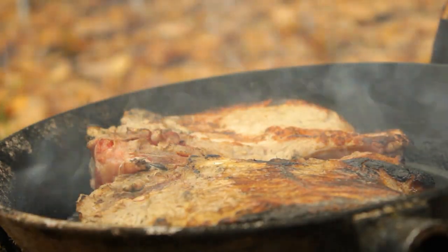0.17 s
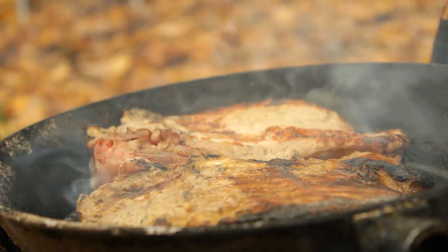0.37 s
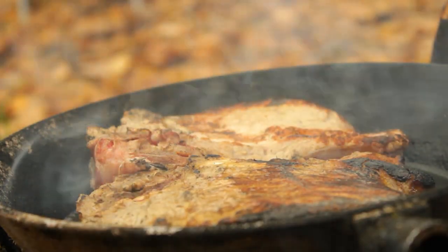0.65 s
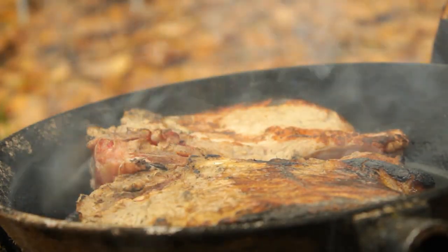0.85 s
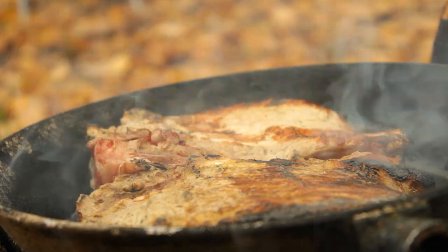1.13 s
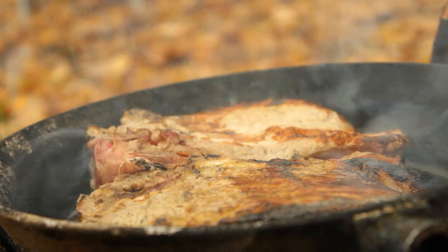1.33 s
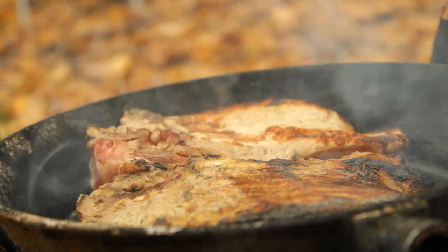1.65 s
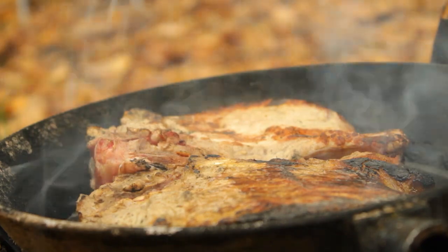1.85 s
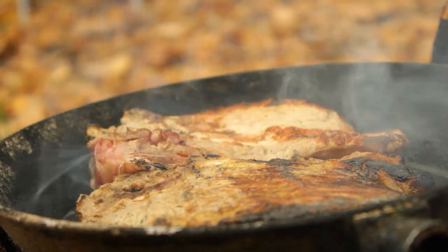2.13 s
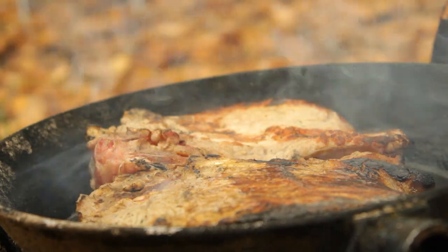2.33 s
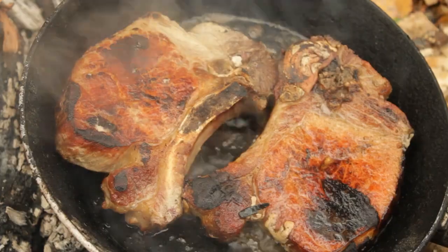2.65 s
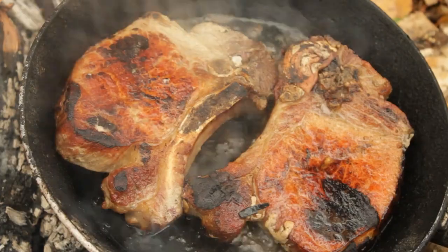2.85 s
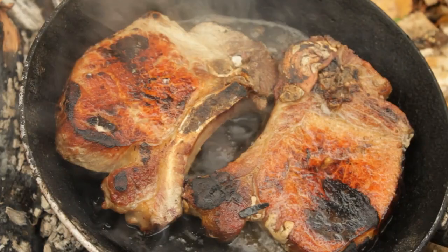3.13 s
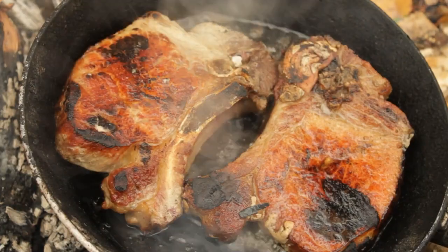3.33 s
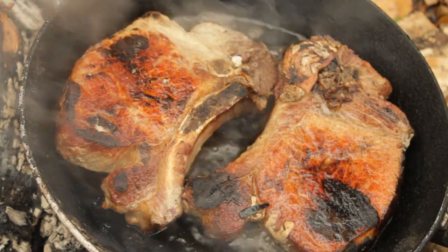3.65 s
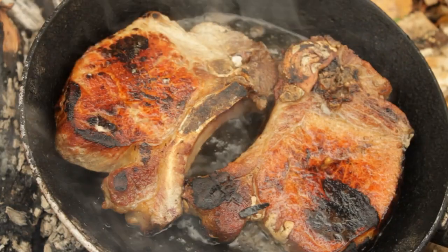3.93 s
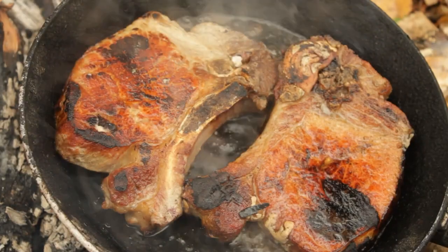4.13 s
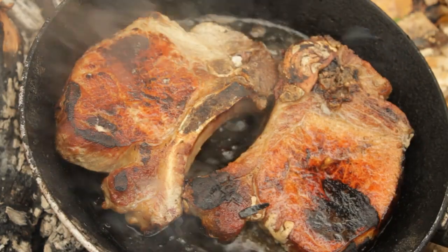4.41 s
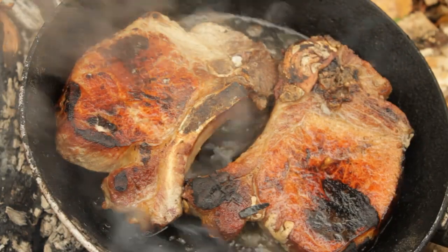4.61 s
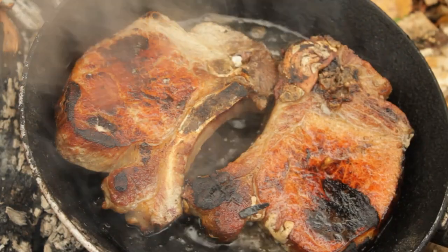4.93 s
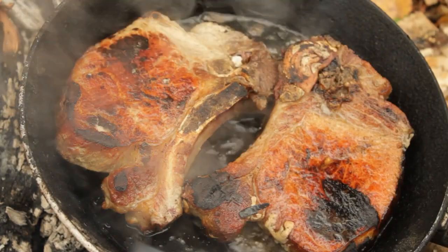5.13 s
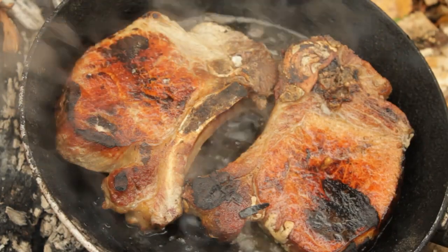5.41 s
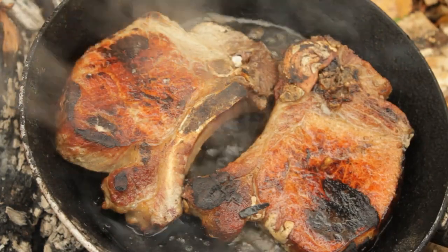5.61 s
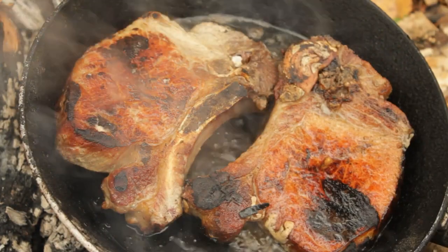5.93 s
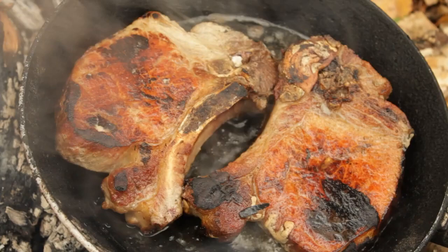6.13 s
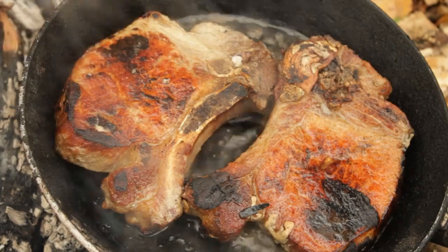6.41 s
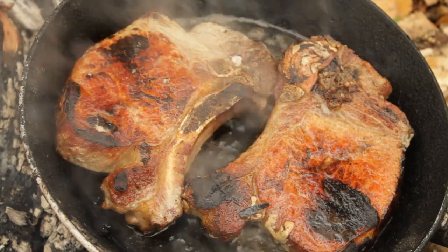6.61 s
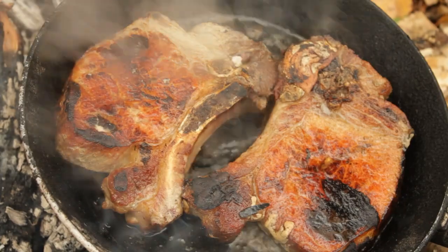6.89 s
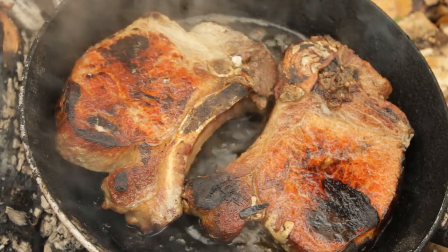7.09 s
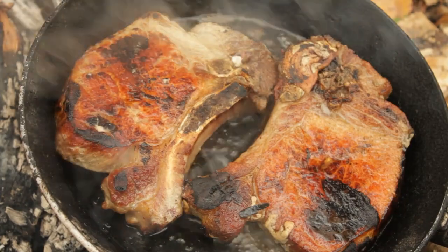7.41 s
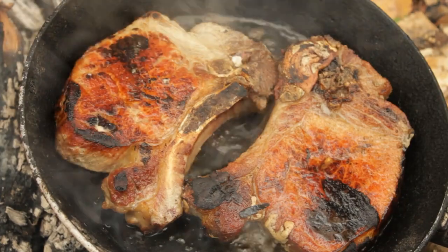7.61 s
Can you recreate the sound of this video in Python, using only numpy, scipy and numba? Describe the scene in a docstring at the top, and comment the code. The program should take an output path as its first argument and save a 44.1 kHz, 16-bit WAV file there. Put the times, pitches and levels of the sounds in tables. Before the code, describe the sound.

Two meat chops fry in hot fat in an iron pan outdoors, heard very close. At first the sizzle is thin, with separate pops, sharp spits and short bubbly blips. After about two and a half seconds, sharp cracks and a faint click mark a sudden change to a denser, brighter sizzle from above. Occasional cracks and bubbles continue; the fire is almost inaudible.

```python
"""Single pops and cracks over a thin sizzle: two chops fry in fat in an iron pan, heard close by from the rim.
The listening place then cuts to above the pan, where the sizzle is denser and brighter. Pings of tiny bubbles,
clicks of fat films and steam hiss make the sizzle. Large steam bubbles are decaying sines that rise in pitch,
spits of fat and a few blunt pops are short noise cracks, faint low bumps (one the click of the cut) are
band-passed pushes; a very faint fire is coloured noise."""
import sys
import numpy as np
from scipy import signal
from scipy.fft import rfft, irfft
from scipy.io import wavfile
from numba import njit

SR = 44100
rng = np.random.default_rng(int(sys.argv[2]) if len(sys.argv) > 2 else 0)


def wrap_up_sound(samples):
    """Save the sound to the file named by the first command line argument, as 16-bit audio."""
    columns = np.atleast_2d(samples).T
    # keep every value between -1 and 1, then stretch to whole-number steps
    tamed = np.clip(columns, -1, 1)
    steps = np.round(tamed * 32767).astype(np.int16)
    wavfile.write(sys.argv[1], SR, steps)


N = 341775
TIME = np.arange(N) / SR


def from_rim():
    """Close at the rim: sparse, distinct pops; fat bubbling beside the meat also rings the hollow there."""
    # how hard the fat boils: t/s, relative level of the fine sizzle/dB
    boil_rows = [(0.0, -33.5), (0.86, -33), (0.97, -36.5), (1.34, -32), (1.48, -38), (1.82, -33),
                 (2.22, -35.5), (2.26, -38), (2.51, -39.5), (2.55, -34.5), (2.61, -35.5)]
    # colour of the frying at the rim: f/Hz, relative level/dB
    tone = [(60, -44), (200, -33), (430, -25.5), (700, -26.5), (1030, -17.5), (1730, -13), (2700, -16.5),
            (3700, -4), (4400, -0.5), (5200, -4), (7300, -6), (9600, -25.5), (12000, -32), (15000, -43)]
    # hollow between meat and pan wall: f/Hz, width/Hz, level of its ring/dB
    hollow_hz, width_hz, hollow_db = (3270, 163, -5.7)

    boil_db = boiling(boil_rows, wander_db=0.06)
    pings = bursts(1300, 10500, cycles=2, spread_db=6.5, cap_db=17, rise=.02, count=4600)
    flurry = flurries(depth_db=6)
    fat = sizzle(boil_db, tone, pings, flurry, snap_db=1.5)
    beside_meat = bursts(hollow_hz - width_hz, hollow_hz + width_hz, cycles=2.6,
                         spread_db=10, cap_db=18, rise=0, count=260)
    fat = fat + undb(boil_db - 8.0) * beside_meat
    fat = fat + pops(boil_db, db=-9, cycles=0.62, count=300)
    hollow_ring = band(fat, hollow_hz - width_hz / 2, hollow_hz + width_hz / 2, order=1)
    return undb(-1.5) * (fat + undb(hollow_db) * hollow_ring)


def from_above():
    """Above the pan its whole floor is open: a dense, bright sizzle over blunt pops."""
    # how hard the fat boils: t/s, relative level of the fine sizzle/dB
    boil_rows = [(2.62, -27.5), (2.66, -27), (2.74, -31.5), (2.82, -29), (3.27, -28.5), (3.38, -29.5),
                 (3.95, -28.5), (4.3, -27.5), (4.35, -33.5), (4.62, -27), (4.8, -28.3), (4.96, -31),
                 (5.25, -28.5), (5.86, -29.5), (5.94, -32.5), (6.18, -26.5), (6.25, -31), (6.73, -31),
                 (7.02, -27), (7.31, -30), (7.37, -32.5), (7.75, -28)]
    # colour of the frying from above: f/Hz, relative level/dB
    tone = [(60, -44), (200, -38.5), (400, -35), (612, -21), (1030, -17.5), (1730, -7.5), (3200, -8),
            (4420, 1), (7100, 2), (8300, -6.5), (9890, -18), (12500, -26), (15000, -41)]

    boil_db = boiling(boil_rows, wander_db=0.37)
    pings = bursts(700, 10500, cycles=2.1, spread_db=6, cap_db=19, rise=.02, count=14000)
    flurry = flurries(depth_db=2.5)
    fat = sizzle(boil_db, tone, pings, flurry, snap_db=4.5)
    return undb(-1.5) * fat + pops(boil_db, db=-9.5, cycles=1.06, count=950)


def sizzle(boil_db, tone, pings, flurry, snap_db):
    """Tiny bubbles ping and films of fat snap over a hiss of steam."""
    crackle = undb(snap_db) * snaps(spread_db=3.0, cap_db=27.0, count=24000)
    steam = undb(-7) * unit(band(rng.standard_normal(N), 200, 10000))
    fat = colour((pings + crackle + steam) * flurry, tone)
    # level the sizzle by its bright part
    bright = band(fat, 3500, 9500, order=4)
    return fat / np.std(bright) * undb(boil_db)


def bursts(lo_hz, hi_hz, cycles, spread_db, cap_db, rise, count):
    """A swarm of bursting bubbles, each ringing briefly at its own pitch, for half to twice the given cycles."""
    when, pitch, strength, ring, side = rng.random((count, 5)).T
    hz = lo_hz + (hi_hz - lo_hz) * pitch
    decay_s = cycles * 2 ** (2 * ring - 1) / hz
    size = sizes(strength, spread_db, cap_db) / np.sqrt(decay_s)  # long rings are no stronger in energy
    polarity = np.sign(side - .5)
    return unit(grains(when * N / SR, hz, decay_s, size * polarity, rise))


@njit
def grains(start_s, hz, decay_s, size, rise):
    """Sines that swell as a bubble opens and die away; the pitch climbs by the share rise in each decay time."""
    out = np.zeros(N)
    for k in range(len(hz)):
        first = int(start_s[k] * SR) + 1
        last = min(N, first + int(8 * decay_s[k] * SR))
        for i in range(first, last):
            t = i / SR - start_s[k]
            age = t / decay_s[k]
            swell = age * np.exp(-age)
            out[i] += size[k] * swell * np.sin(2 * np.pi * hz[k] * t * (1 + rise * age / 2))
    return out


def snaps(spread_db, cap_db, count):
    """Tearing films of fat: dry clicks one sample long, of either polarity."""
    when, strength, side = rng.random((count, 3)).T
    push = sizes(strength, spread_db, cap_db) * np.sign(side - .5)
    return unit(np.bincount((when * N).astype(int), push, N))


def pops(boil_db, db, cycles, count):
    """Juice boils up through the fat in blunt, short pops."""
    swarm = bursts(1500, 3900, cycles=cycles, spread_db=8, cap_db=15, rise=.025, count=count)
    return undb(boil_db + db) * unit(band(swarm, 740, 5900, order=3))


def boiling(rows, wander_db):
    """Level of the boil in dB: a drawn course, wavering slightly at random, several times a second."""
    return curve(rows) + wander_db * walk(14)


def flurries(depth_db):
    """Random gain for sputter in flurries a few milliseconds long, as when one burst sets off its neighbours."""
    return undb(depth_db * np.tanh(.85 * walk(400) + .3 * walk(110)))


def sizes(chance, spread_db, cap_db):
    """Many small bursts and few large ones, up to a largest size."""
    raw_db = -spread_db * np.log(1 - chance)
    return undb(cap_db * np.tanh(raw_db / cap_db))


def large_bubbles(rise=0.02, ring_cycles=4.4, tear_db=-6, tear_ms=0.69):
    """The skin tears with a short rasp; the cavity rings and climbs in pitch (share per ms) as it shrinks."""
    # the largest steam bubbles: t/s, starting f/Hz, relative level/dB
    bubble_rows = [(0.048, 1780, -22.5), (0.106, 2460, -24), (0.173, 4700, -18.5), (0.213, 3260, -23),
                   (0.269, 1780, -21), (0.516, 3080, -21), (0.909, 2210, -26), (1.025, 2930, -27),
                   (1.046, 4190, -14.5), (1.238, 2810, -21), (1.323, 3120, -27), (1.525, 3120, -25),
                   (1.553, 3260, -19.5), (1.599, 2440, -19), (1.74, 2470, -23), (2.073, 2350, -19),
                   (2.117, 4230, -25), (2.772, 2000, -22), (2.838, 2420, -14), (3.078, 2170, -20.5),
                   (3.252, 2210, -22), (3.572, 1440, -22), (3.842, 1950, -20), (3.963, 2250, -20.5),
                   (4.045, 2050, -23.5), (4.59, 1700, -19), (4.656, 1340, -27), (4.807, 3030, -15),
                   (5.552, 2810, -20), (6.074, 1900, -23), (6.109, 2030, -20), (6.498, 2570, -16.5),
                   (6.684, 2470, -20), (7.284, 1600, -18.5), (7.623, 1790, -21)]
    out, ms = np.zeros(N), np.arange(SR // 40) * 1000 / SR
    for s, hz, db in bubble_rows:
        turns = hz * ms / 1000
        # decay is set in cycles, so a lower bubble rings longer
        shape = (1 - np.exp(-turns)) ** 2 * np.exp(-turns / ring_cycles)
        ring = shape / shape.max() * np.sin(2 * np.pi * turns * (1 + rise * ms / 2))
        tear = band(rng.standard_normal(len(ms)) * np.exp(-ms / tear_ms), hz / 2, hz + 1900)
        add(out, s, undb(db) * (ring + undb(tear_db) * tear / np.abs(tear).max()))
    return band(out, 310, 9400)


def short_cracks(fast_s=.0005, spray_s=0.00039, spray_db=-15, bright_db=-25):
    """Short noise cracks: sharp spits of fat and a few blunt bubble pops, each a band of decaying noise."""
    # spits and blunt pops: t/s, centre f/Hz, peak level before the pan echo/dB
    crack_rows = [(0.033, 3930, -12.5), (0.588, 2960, -13), (0.708, 2350, -12.5), (0.801, 4900, -16),
                  (0.871, 6900, -11), (1.221, 1280, -22.5), (1.378, 4900, -9.5), (1.921, 4130, -27),
                  (1.945, 1080, -22), (2.212, 2300, -16), (2.243, 1740, -23), (2.291, 4970, -14),
                  (2.294, 6400, -8), (2.662, 4830, -12), (2.694, 6000, -8), (3.545, 1100, -25.5),
                  (3.564, 4900, -10), (3.792, 1500, -21), (5.378, 1110, -27.5), (5.863, 6240, -13),
                  (6.203, 5300, -12.5), (6.304, 5600, -10.5), (6.376, 6500, -18), (6.666, 4720, -14),
                  (7.327, 6800, -8.5)]
    out, t = np.zeros(N), TIME[:SR // 40]
    for s, hz, db in crack_rows:
        decay = np.exp(-t / fast_s) + undb(spray_db) * np.exp(-t / spray_s)
        blast = band(rng.standard_normal(len(t)) * decay, hz * 0.75, hz * 1.24, order=1)
        crack = band(blast, 500, 7600, order=4) + undb(bright_db) * blast
        add(out, s, undb(db) * crack / np.abs(crack).max())
    return out


def pan_echo(x, echo_db=-10.5, decay_s=.0065):
    """Iron walls and meat scatter each burst for milliseconds: noise follows its energy, band by band."""
    keep, tail = np.exp(-2 / (decay_s * SR)), 0  # energy dies twice as fast as amplitude
    for lo in 500 * 2 ** (np.arange(8) / 2):  # half-octaves, 500 Hz to 8 kHz
        hi = lo * np.sqrt(2)
        energy = signal.lfilter([1 - keep], [1, -keep], band(x, lo, hi, order=3) ** 2)
        scatter = unit(band(rng.standard_normal(N), lo, hi, order=3))
        tail = tail + np.sqrt(energy) * scatter
    return x + undb(echo_db) * tail


def low_bumps():
    """Faint low bumps, each a band-passed push; the one at 2.619 s clicks at the cut of listening place."""
    # low bumps: t/s, lower edge f/Hz, upper edge f/Hz, peak level/dB
    bump_rows = [(2.29, 150, 600, -51), (2.619, 30, 1200, -34.5), (3.627, 230, 420, -50),
                 (4.53, 170, 450, -58)]
    out, push = np.zeros(N), signal.unit_impulse(SR // 6)
    for s, lo_hz, hi_hz, db in bump_rows:
        bump = band(push, lo_hz, hi_hz)
        add(out, s, undb(db) * bump / np.abs(bump).max())
    return out


def fire():
    """Low murmur of the flames: coloured noise whose level wavers at random by a dB or so."""
    # colour of the murmur: f/Hz, relative level/dB
    flame_tone = [(20, -14), (70, 0), (130, -9), (300, -3.5), (800, -2), (3000, -41)]
    return unit(colour(rng.standard_normal(N), flame_tone)) * undb(walk(3.4))


def undb(db):
    """Decibels to gain."""
    return 10 ** (np.asarray(db) / 20)


def curve(rows):
    """Rows of (s, value) joined by straight lines."""
    return np.interp(TIME, *np.transpose(rows))


def band(x, lo_hz, hi_hz, order=2):
    """Butterworth band-pass."""
    edges = [lo_hz, min(hi_hz, SR / 2 - 100)]
    return signal.sosfilt(signal.butter(order, edges, "band", fs=SR, output="sos"), x)


def unit(x):
    """Scale to a standard deviation of 1."""
    return x / np.std(x)


def walk(rate):
    """Random levels, rate of them per second, joined by straight lines; spread near 1."""
    steps = rng.standard_normal(N // 20)
    return unit(np.interp(TIME * rate, np.arange(len(steps)), steps))


def colour(x, points, size=2048):
    """Minimum-phase filter through (Hz, dB) points, so that clicks keep their sharp front."""
    hz, db = np.transpose(points)
    bins_hz = np.arange(size // 2 + 1) * SR / size
    log_gain = np.log(undb(np.interp(np.log(bins_hz + 1), np.log(hz), db)))
    # folding the cepstrum forward makes the filter causal
    cepstrum = irfft(log_gain)
    cepstrum[1:size // 2] *= 2
    cepstrum[size // 2 + 1:] = 0
    response = irfft(np.exp(rfft(cepstrum)))
    return signal.fftconvolve(x, response)[:N]


def add(out, s, sound):
    """Mix a short sound in at time s."""
    i = int(np.clip(s * SR, 0, N - 1))
    out[i:i + len(sound)] += sound[:N - i]


def scene(move_s=2.619):
    """The pan from the rim, then from above, with the fire beneath."""
    above = np.clip((TIME - move_s) / 0.0016, 0, 1)  # the listening place changes within 1.6 ms
    fat = (1 - above) * from_rim() + above * from_above() + large_bubbles() + short_cracks()
    flames = fire() * ((1 - above) * undb(-76.5) + above * undb(-79.5))
    return (pan_echo(fat) + low_bumps() + flames)[None]


def record(dry, top_hz=15400):
    """The recorder behind the microphone cuts the top with a steep low-pass."""
    return signal.sosfilt(signal.ellip(10, .2, 80, top_hz, fs=SR, output="sos"), dry)


dry = scene()
out = record(dry)
wrap_up_sound(out)
```